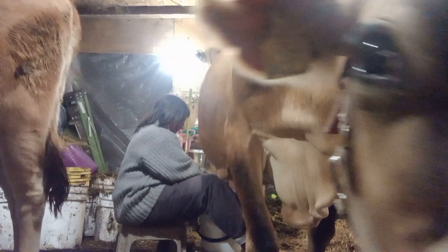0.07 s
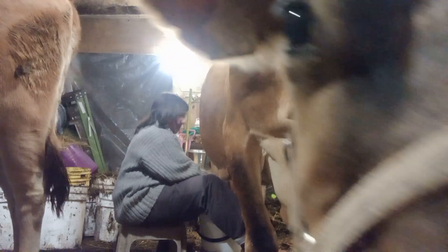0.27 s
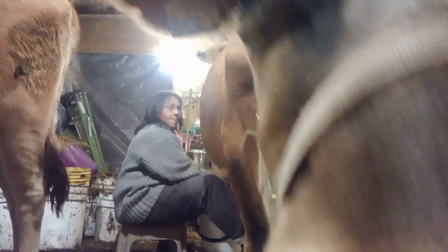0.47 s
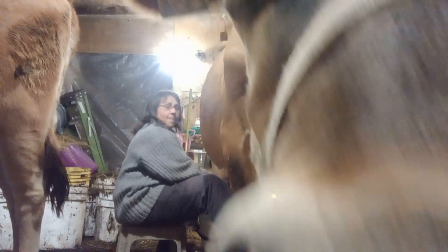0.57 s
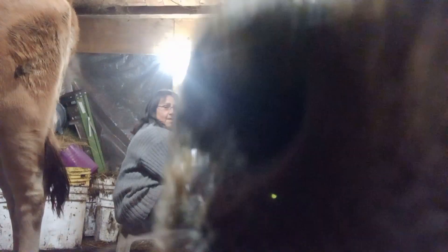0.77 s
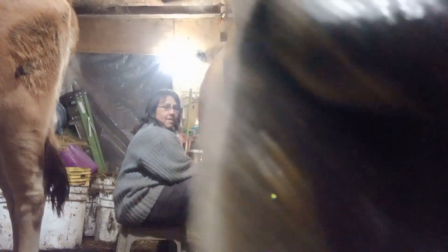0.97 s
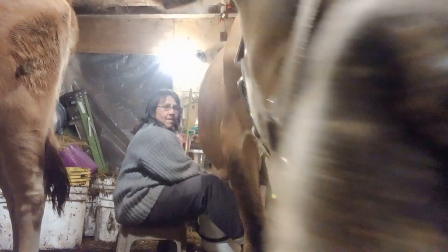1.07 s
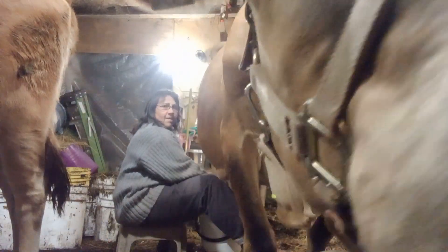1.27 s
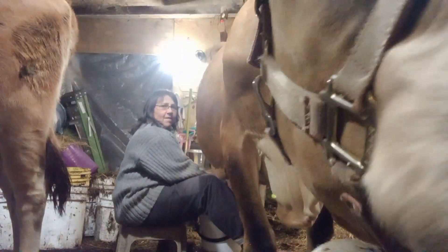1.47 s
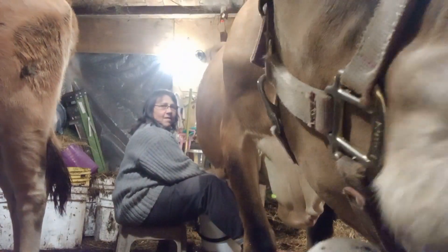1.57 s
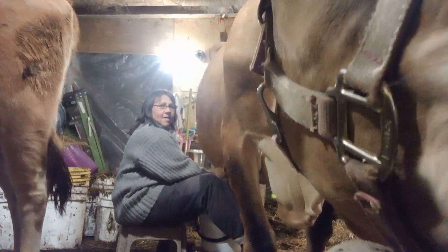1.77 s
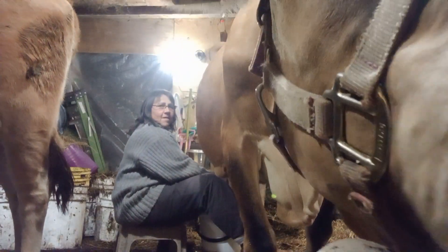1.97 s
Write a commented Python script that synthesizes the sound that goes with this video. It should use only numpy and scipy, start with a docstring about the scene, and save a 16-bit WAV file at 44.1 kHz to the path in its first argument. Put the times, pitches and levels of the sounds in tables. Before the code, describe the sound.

A cow moos very close to a stereo microphone in a barn, already sounding at the start, rising slowly, then sagging and breaking up into rough breath, with small knocks and faint halter clinks.

```python
"""In a barn, a cow moos one long call close to a two-port microphone: it rises slowly, then sags and breaks up.
The moo is a stack of harmonics with breath puffed once a cycle, coloured by throat and barn.
Its breath, as lumpy low noise, buffets both ports at the start and mostly the right as the call breaks up.
Halter metal clinks as decaying tones, something knocks as noise ringing a broad resonance, and fur
swishes past as grainy treble hiss, all over quiet, drifting barn air."""
import sys
import numpy as np
from scipy import signal
from scipy.io import wavfile
from scipy.ndimage import uniform_filter1d

SR = 44100
rng = np.random.default_rng(int(sys.argv[2]) if len(sys.argv) > 2 else 0)


def dump(signal):
    """Clip the signal to [-1, 1] and save it as 16-bit WAV at the path in sys.argv[1]."""
    limited = np.clip(np.atleast_2d(signal).T, -1, 1)
    pcm = np.round(limited * 32767).astype(np.int16)
    wavfile.write(sys.argv[1], SR, pcm)


N = 89346  # length in samples


def gain_of(db):
    """dB to gain."""
    return 10 ** (np.asarray(db) / 20)


def evened(x):
    """Scaled to rms 1."""
    return x / np.sqrt(np.mean(x ** 2) + 1e-20)


def curves(table):
    """Every column of a time table, one value per sample."""
    rows = np.array(table, float)
    return [np.interp(np.arange(N) / SR, rows[:, 0], col) for col in rows[:, 1:].T]


def read(points, hz, axis=1):
    """One column of a spectrum table on a log-frequency axis."""
    rows = np.array(points, float)
    return np.interp(np.log(hz + 1), np.log(rows[:, 0] + 1), rows[:, axis])


def noise(colour_db, patchy_db, same, size=512):
    """Two-port noise of a given colour with drifting patches; same (0-1) is how alike the ports are; rms 1."""
    z = rng.standard_normal((N * 4 // size + 5, size // 2 + 1, 5)).T
    # patches 8 bins wide and 4 frames long, shared by both ports
    patches = evened(uniform_filter1d(uniform_filter1d(z[4], 8, 0), 4, 1))
    same = np.clip(same, 0, 1)
    left = z[0] + 1j * z[1]
    right = same * left + np.sqrt(1 - same ** 2) * (z[2] + 1j * z[3])
    hz = np.fft.rfftfreq(size, 1 / SR)
    colour = np.reshape(colour_db(hz), (-1, len(hz), 1))
    pair = np.array([left, right]) * gain_of(colour + patchy_db * patches)
    return evened(signal.istft(pair, nperseg=size, noverlap=size * 3 // 4)[1][:, :N])


def add(mix, start_s, sound, pan_db):
    """Places a sound between the ports; pan_db is left minus right."""
    part = mix[:, round(start_s * SR):][:, :sound.shape[-1]]
    part += (gain_of([[pan_db / 2], [-pan_db / 2]]) * sound)[:, :part.shape[1]]


def barn_air():
    """Quiet, patchy broadband noise, nearly unrelated at the two ports."""
    # spectrum of the air: pitch_hz [Hz], density_db [relative dB per Hz]
    air_colour = [(24, -35.5), (40, -13.5), (552, 7.5), (800, -4.5), (3480, -18.5), (6220, -22.5),
                  (15400, -39), ]
    level_db = -36.5
    return gain_of(level_db) * noise(lambda f: read(air_colour, f), 2.0, 0.12, size=1024)


def swishes():
    """Breath and brushing fur: bursts of grainy treble hiss with a quick rise and a slower fall."""
    # each burst: start_s [s], length_s [s], level_db [dB], pan_db [left minus right dB], tilt_db [dB per octave]
    bursts = [(0.539, 0.092, -39.5, 6, 4.5), (1.189, 0.07, -47.5, -11, 9.5), (1.403, 0.16, -45, -8, 2),
              (1.499, 0.37, -52, -15, 1.5)]
    # spectrum of the hiss before tilt: pitch_hz [Hz], density_db [relative dB per Hz]
    hiss_colour = [(1470, -33.5), (2500, 6), (7900, -5.5), (9040, -19), (15100, -3), (16100, -14.5)]
    out = np.zeros((2, N))
    for start_s, length_s, level_db, pan_db, tilt_db in bursts:
        def colour_db(f):
            tilt = tilt_db * np.log2(f / 8000 + .01)
            return read(hiss_colour, f) + tilt - 60 * (f < 1700)

        u = np.arange(0, 1, 1 / (length_s * SR))  # progress through the burst
        hiss = evened(noise(colour_db, 1.5, .2, size=256)[:, :len(u)])
        grain = gain_of(2.0 * evened(uniform_filter1d(rng.standard_normal(len(u)), 90)))
        envelope = np.minimum(np.minimum(u / 0.11, (1 - u) / 0.39), 1)
        add(out, start_s, gain_of(level_db) * envelope * grain * hiss, pan_db)
    return out


def buffeting():
    """Breath striking the ports: lumpy low noise, only loosely related from left to right."""
    # breath on each port over time: time_s [s], left_db [dB], right_db [dB]
    breath_levels = [(0, -12.5, -11.5), (.08, -12, -14.5), (.12, -24, -23), (.19, -16.5, -17),
                     (.21, -20, -23.5), (.66, -60, -26), (.68, -36, -30.5), (1.32, -56, -55),
                     (1.36, -42, -12.5), (1.6, -28, -10.5), (1.72, -32, -13), (1.79, -30, -14.5),
                     (1.82, -24.5, -37), (1.9, -32.5, -63)]
    # spectrum of the buffeting: pitch_hz [Hz], density_db [relative dB per Hz]
    buffet_colour = [(18, -39.5), (30, -29.5), (76, -1.5), (255, -0.5), (891, -26), (3000, -42.5),
                     (3900, -77.5), (6600, -120)]
    lumps = evened(uniform_filter1d(rng.standard_normal((N, 2)).T, 500))
    rumble = noise(lambda f: read(buffet_colour, f), 1.5, .35, size=1024)
    return rumble * gain_of(np.array(curves(breath_levels)) + 1.2 * lumps)


def knocks():
    """Short dull raps: a noise burst rings one broad resonance, with a higher crack that grows with the blow."""
    # each rap: start_s [s], level_db [dB], pitch_hz [Hz], t60_s [s], pan_db [left minus right dB]
    raps = [(0.0568, -8, 1296, 0.04, -5), (.082, -20.5, 1630, 0.018, 9), (.162, -27, 1430, 0.035, -9),
            (0.191, -19.5, 1290, 0.053, -2), (1.126, -21, 3730, 0.012, -1.5), (1.632, -30, 671, 0.026, -8),
            (1.714, -33, 3700, 0.012, 7), (1.922, -28, 595, 0.39, -4)]
    out, t = np.zeros((2, N)), np.arange(6000) / SR
    for start_s, level_db, pitch_hz, t60_s, pan_db in raps:
        z = rng.standard_normal((len(t), 2)).T
        blow = z + z[0]  # partly shared by the ports
        peak = signal.iirpeak(pitch_hz, 2.5, fs=SR)
        ring = evened(signal.lfilter(*peak, signal.lfilter(*peak, blow)))
        band = signal.butter(4, [.3 * pitch_hz, 1.7 * pitch_hz], "band", fs=SR, output="sos")
        wide = evened(signal.sosfilt(band, z))
        crack = evened(signal.lfilter(*signal.iirpeak(3 * pitch_hz, 6, fs=SR), blow)) * np.exp(-t / .004)
        envelope = gain_of(level_db - 60 * t / t60_s) * (1 - np.exp(-t / 0.001))
        add(out, start_s, envelope * (ring + .7 * wide + gain_of(level_db) * crack), pan_db)
    return out


def clinks():
    """Small steel halter rings touch: a noise tick and two pairs of high, decaying tones."""
    # each touch: start_s [s], level_db [dB], low_db [low pair minus high pair dB], pan_db [left minus right dB]
    touches = [(0, -55, 3, -29), (.066, -30, -17, -16.5), (0.28, -36.5, -8.5, -10.5)]
    # tones of the rings: pitch_hz [nominal Hz, varied a little at each touch], t60_s [s]
    ring_tones = [(9480, 0.059), (9781, 0.26), (14860, .06), (15190, 0.13)]
    out, t = np.zeros((2, N)), np.arange(12000) / SR
    for start_s, level_db, low_db, pan_db in touches:
        ring = np.zeros(len(t))
        for pitch_hz, t60_s in ring_tones:
            decay = gain_of(low_db * (pitch_hz < 12000) - 60 * t / t60_s)
            ring += decay * np.sin(2 * np.pi * pitch_hz * rng.uniform(0.98, 1.003) * t)
        tick = gain_of(-1.0 - 60 * t / 0.0056) * np.diff(rng.standard_normal(len(t) + 1))
        add(out, start_s, gain_of(level_db) * (ring + tick), pan_db)
    return out


def barn(x):
    """Scattered reflections of the treble off stalls and rafters, different at each port."""
    level_db, t60_s, from_hz = -8, .25, 1250
    t = np.arange(16000) / SR
    taps = rng.standard_normal((len(t), 2)).T
    taps = taps * (rng.random((len(t), 2)).T < .05) * gain_of(-60 * t / t60_s)  # sparse and dying away
    taps = taps / np.linalg.norm(taps, axis=1)[:, None]
    taps = signal.sosfilt(signal.butter(3, from_hz, "high", fs=SR, output="sos"), taps)
    return x + gain_of(level_db) * signal.fftconvolve(x, taps, axes=1)[:, :N]


def moo():
    """Vocal pulses as harmonics through throat and barn, the upper ones scattered and wavering, plus breath puffs."""
    # the call over time: time_s [s], pitch_hz [Hz], level_db [dB], mouth [opening 0-1],
    # breath_db [relative dB, steers both puffs and pitch wobble]
    call = [(0, 92.28, -8.5, 0.13, 0), (.09, 93.4, -10, 0.15, -1), (.13, 95.2, -6.5, 0.39, -43),
            (.24, 96.52, -5.5, 0.02, -16), (.36, 98.93, -6, 0.07, -34.5), (.5, 101.5, -4.5, 0.57, -36.5),
            (.62, 105.9, -1.5, 0.63, -15), (.78, 111.7, -0.5, 0.67, -34), (.94, 114.7, -3, 0.95, -21.5),
            (.99, 117.1, -2, 0.8, -28), (1.27, 118.5, -2, 0.62, -26.5), (1.38, 117.4, -2.5, 0.78, -41),
            (1.45, 117.9, -8.5, 1, -11.5), (1.49, 110.9, -7, 1, -4), (1.54, 100.5, -10, 0.98, -0.5),
            (1.6, 99, -39, 0.3, 28)]
    # throat and barn at each port: pitch_hz [Hz], left_db [dB], right_db [dB], open_db [change at full opening, dB]
    throat = [(96.7, -16, -18.5, 6), (121, -35.5, -30, 0), (211, -13.5, -18.5, 4), (229.3, -11.5, -10, 3.5),
              (287, -14, -39, 0.5), (293, -4, -14.5, 3), (315, -17.5, -25.5, -6.5), (331, -12, -16, -5.5),
              (356.2, -17.5, -22.5, 5.5), (363, -26.5, -18, -1.5), (444, -29, -19.5, -14.5),
              (459.7, -16, -12, -13), (493, -10, -15, -2), (542, -35.5, -29.5, -10.5),
              (589.7, -19, -23.5, 0), (603, -13, -13, -0.5), (615.3, -23, -17, -5), (699, -25, -30.5, -1),
              (780, -43.5, -32.5, -1.5), (836, -38.5, -24, 0), (891, -30.5, -51.5, 6),
              (1027, -39.5, -32, 4.5), (980, -54.5, -28.5, -1.5), (1175.5, -22.5, -25, -0.5),
              (1170, -33.5, -41.5, 0), (1200, -28.5, -31, 0.5), (1433, -36.5, -36.5, -4),
              (1640, -52, -52.5, 10), (1786, -43, -47, 9.5), (2230, -62.5, -50, 22), (2690, -52, -59.5, 4),
              (2990, -56, -48.5, 10), (3625, -57, -64.5, 12.5), (3930, -65, -62.5, -9)]
    # three narrow mouth resonances that glide and swell, each: time_s [s], pitch_hz [Hz], lift_db [dB]
    mouth_peaks = [
        [(.5, 1125, -4), (.8, 1146, 15), (.95, 1080, -4.5), (1.13, 1060, -1), (1.22, 1064, 10.5),
         (1.36, 1050, 11), (1.45, 1070, 7)],
        [(.17, 1320, 9), (.27, 1375, 12), (.45, 1405, 15.5), (1.0, 1400, 13), (1.08, 1400, -1)],
        [(.4, 2253, 16.5), (.57, 2294, 21.5), (.75, 2090, -1), (.94, 1920, 9.5), (1.06, 1863, 12)],
    ]
    half_width_hz = 36.7  # of a mouth resonance
    jitter, shimmer_db = .0015, 1.8
    right_lag_s = 0.00047
    spread_turns, scattered_from = .012, 9  # phase spread per harmonic squared; harmonic fully scattered

    hz, level_db, mouth, breath_db = curves(call)
    wobble = evened(uniform_filter1d(rng.standard_normal(N), 300)) * jitter * gain_of(breath_db + 26.0)
    turns = np.cumsum(hz * (1 + np.clip(wobble, -.3, .3))) / SR
    out = np.zeros((2, N))
    slow = slice(None, None, 32)  # levels are worked out every 32 samples
    peaks = np.array([curves(table) for table in mouth_peaks])[:, :, slow]
    for k in range(1, 46):
        f = k * hz[slow]
        loose = min(k / scattered_from, 1) ** 2
        peak_db = sum(lift_db / (1 + ((f - peak_hz) / half_width_hz) ** 2) for peak_hz, lift_db in peaks)
        waver_db = shimmer_db * loose * evened(uniform_filter1d(rng.standard_normal(len(f)), 30))
        offset = spread_turns * k * k + loose * rng.random()
        for port, lag_s in enumerate([0, right_lag_s]):
            db = read(throat, f, axis=1 + port) + mouth[slow] * read(throat, f, axis=3) + peak_db
            slow_size = gain_of(uniform_filter1d(db, 25) + waver_db)
            size = np.interp(np.arange(N), np.arange(N)[slow], slow_size)
            out[port] += np.sqrt(2) * size * np.cos(2 * np.pi * (k * (turns - lag_s * hz) + offset))

    def breath_colour(f):
        open_db = 1.18 * read(throat, f, axis=3)
        return [uniform_filter1d(read(throat, f, axis=p) + open_db, 3) for p in (1, 2)]

    breath = noise(breath_colour, 0.67, 0.94, size=1024)
    pulse = 0.71 + np.exp(-(turns % 1) / 0.17)  # one puff a cycle over a steady flow
    puffs = breath * pulse * gain_of(breath_db - 24)
    return (out + puffs) * gain_of(level_db)


def scene():
    """All sources over the barn air; only the moo is given reflections."""
    air = barn_air()
    return barn(moo()) + knocks() + clinks() + buffeting() + swishes() + air


def record(dry):
    """The microphone drops deep bass, the sound fades out, the ports differ, peaks round off, the top is cut."""
    fade_from_s, fade_db_per_s, silent_s = 1.891, 160, 2.004
    port_hz, port_db = 8100, 4.5  # the left port lifts this band, the right one dips it
    top_hz = 15950
    t = np.arange(N) / SR
    thinned = signal.sosfilt(signal.butter(4, 68, "high", fs=SR, output="sos"), dry)
    fade = gain_of(-fade_db_per_s * np.maximum(t - fade_from_s, 0))
    faded = thinned * fade * np.clip((silent_s - t) / 0.0017, 0, 1)
    port_band = signal.lfilter(*signal.iirpeak(port_hz, 3.5, fs=SR), faded)
    heard = faded + (gain_of([[port_db], [-port_db]]) - 1) * port_band
    rounded = heard / (1 + abs(heard / .99) ** 6) ** (1 / 6)
    low_pass = signal.firwin(511, top_hz, window=("kaiser", 9), fs=SR)
    return signal.oaconvolve(rounded, low_pass[None], "same")


dry = scene()
out = record(dry)
dump(out)
```